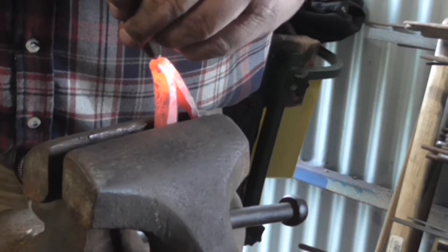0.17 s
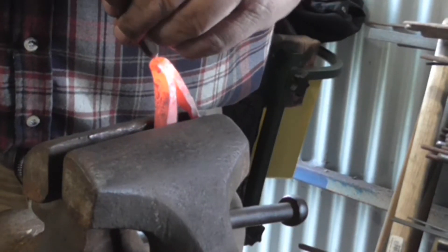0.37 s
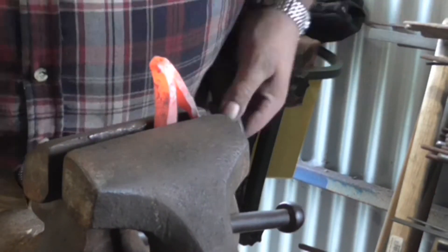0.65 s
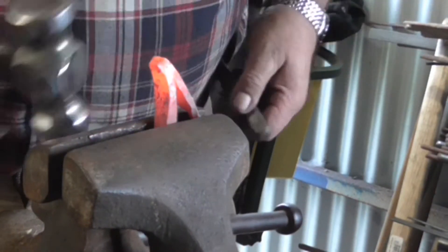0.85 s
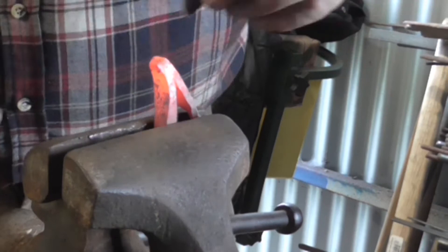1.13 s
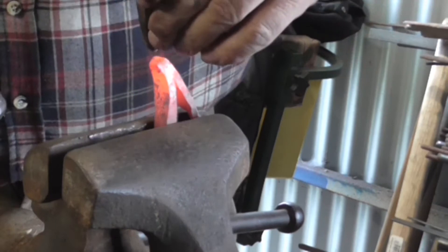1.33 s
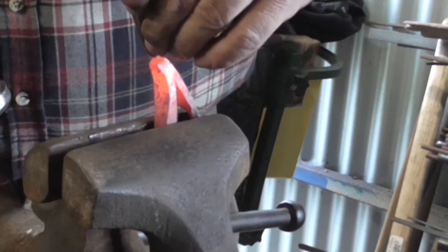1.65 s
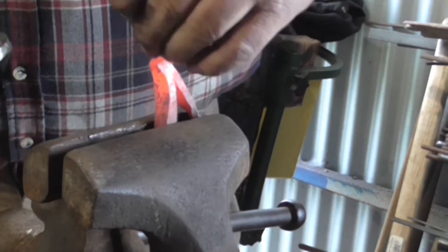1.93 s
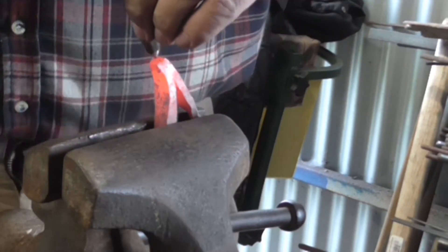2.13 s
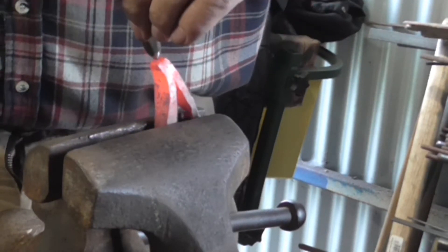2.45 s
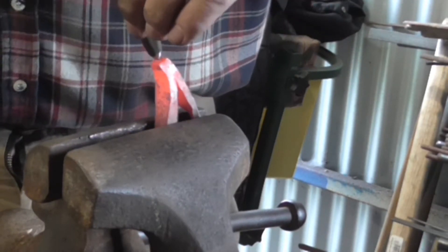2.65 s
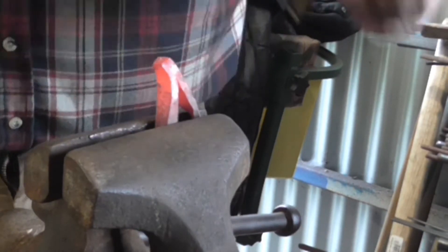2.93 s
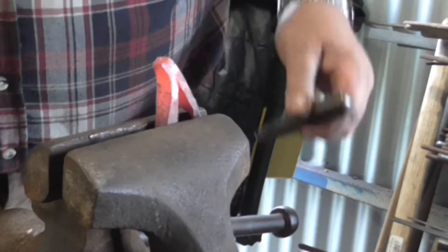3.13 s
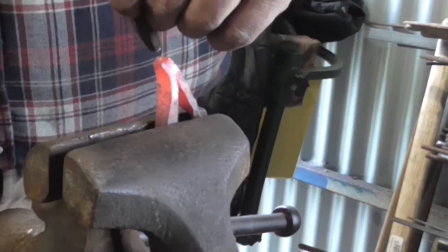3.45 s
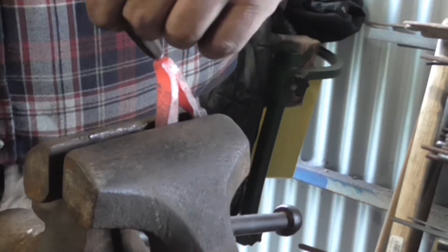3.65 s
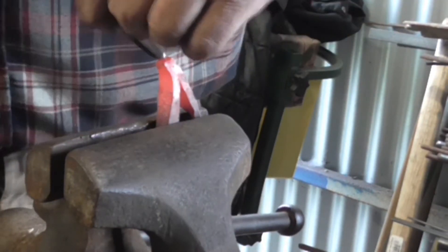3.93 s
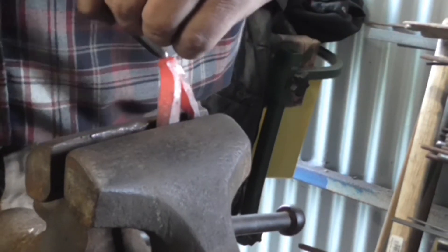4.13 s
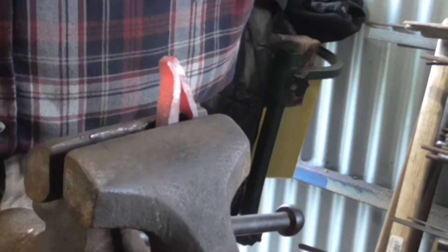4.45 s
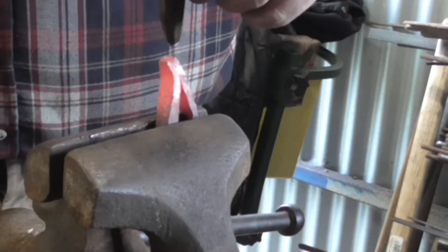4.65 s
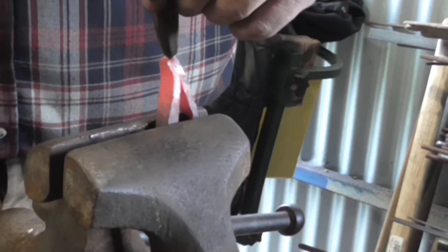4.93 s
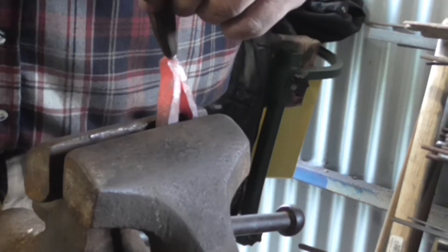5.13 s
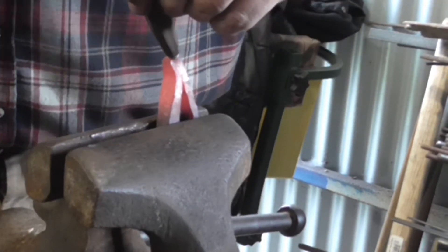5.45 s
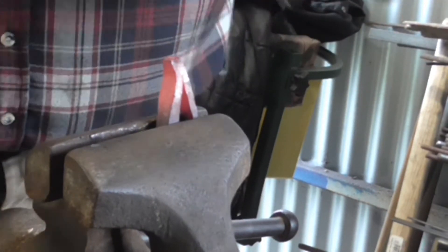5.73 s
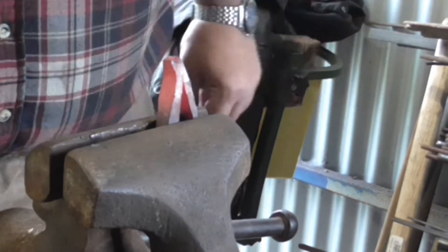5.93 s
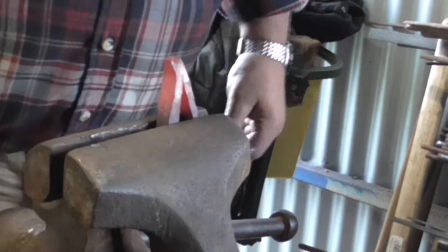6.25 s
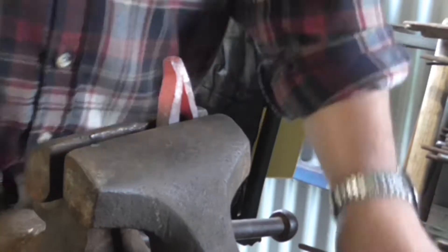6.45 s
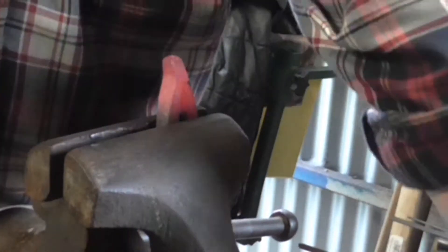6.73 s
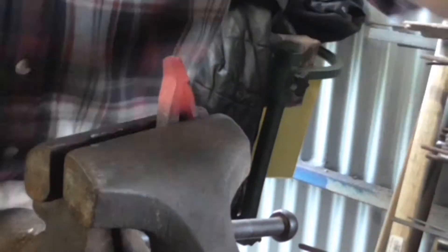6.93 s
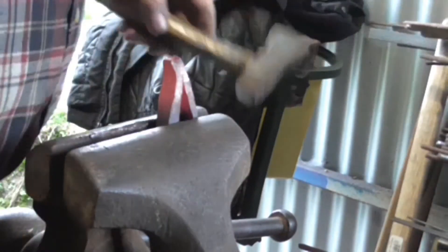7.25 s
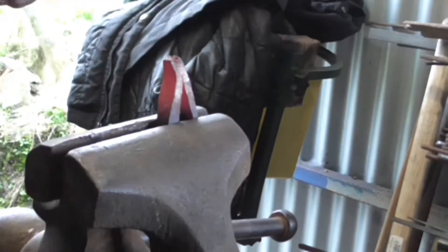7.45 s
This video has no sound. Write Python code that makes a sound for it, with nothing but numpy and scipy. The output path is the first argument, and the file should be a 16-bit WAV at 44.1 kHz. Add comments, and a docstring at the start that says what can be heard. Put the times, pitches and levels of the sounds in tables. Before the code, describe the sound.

Close stereo pickup in a metal shed workshop: constant midrange whoosh of a forge fan, throughout. Over it come one early steel knock, three groups of sharp, loud hammer strikes on a punch held to hot iron in a vice, and a bright ping as the punch bounces. After the last blow a tool clinks and scrapes on the vice and knocks again. Automatic level control sucks the roar down after every strong hit.

```python
"""A forge blower roars steadily in a tin-walled smithy: coloured noise under wavering sine whines.
Steel tools knock, clink and slide on a vice before, among and after the blows: noise and ringing modes.
A smith taps a punch into hot iron held in the vice: bright cracks, the ring of the vice, the shed's echo.
Every blow drives the limiter down, so the roar drops away and swells back."""
import sys
import numpy as np
from scipy import signal
from scipy.fft import rfft, irfft, next_fast_len
from scipy.io import wavfile
from scipy.ndimage import uniform_filter1d, minimum_filter1d

SR = 44100
rng = np.random.default_rng(int(sys.argv[2]) if len(sys.argv) > 2 else 0)


def wav_out(sig):
    """Save sig, one row per channel (or a flat mono array), as 16-bit PCM at SR to the path in sys.argv[1]."""
    wavfile.write(sys.argv[1], SR, np.round(np.clip(np.atleast_2d(sig).T, -1, 1) * 32767).astype(np.int16))


N = 334719
TIME = np.arange(N) / SR
HIT_TIME = TIME[:SR // 2]


def from_db(db):
    """Decibels to gain."""
    return 10 ** (np.asarray(db) / 20)


def rms_one(x):
    """Scale to rms 1."""
    return x / np.sqrt(np.mean(x ** 2) + 1e-20)


def at_hz(points, hz):
    """Read a spectrum along a logarithmic frequency axis."""
    f, db = np.transpose(points)
    return np.interp(np.log(hz), np.log(f), db)


def bins(size):
    """Frequencies of a spectrum of this many samples, kept at 1 Hz or more for the logarithms."""
    return np.maximum(np.fft.rfftfreq(size, 1 / SR), 1)


def drift(rate):
    """Slow random curve: straight lines between normal random knots, this many per second."""
    knots = rng.standard_normal(1024)
    return np.interp(TIME * rate, np.arange(len(knots)), knots)


def noise(level_db, width, size):
    """Stereo noise with the given relative level in each frequency bin; rms 1."""
    mid, side = rfft(rng.standard_normal((2, size))) * from_db(level_db)
    side = side * from_db(at_hz(width, bins(size)))
    return rms_one(irfft([mid + side, mid - side], size))


# rush of air and fire: (frequency [Hz], relative level [dB per Hz])
AIR_AND_FIRE_RUSH = [(20, -33), (60, -30), (130, -27.5), (210, -24.5), (265, -11.5), (365, -14.5),
                     (410, -4), (850, -1.5), (1400, -8.5), (2500, -9), (2750, -13), (6100, -19),
                     (7600, -27), (10000, -26.5), (11800, -24.5), (16000, -28.5)]
# resonances of the blower housing and the hearth: (frequency [Hz], width [Hz], boost over the rush [dB])
HOUSING_RESONANCES = [(495, 73, 8.5), (578.4, 79, 6.5), (678, 10, 14), (751.6, 91, 7.5), (868, 85, 2),
                      (1103, 112, 7), (1297, 24, 8.5), (1674, 28, 9), (1820, 22, 2.5), (1937, 12.4, 10.5),
                      (2070, 20, -1), (2165, 32, 5.5), (2325, 13, 3.5), (2850, 15, 9), (3270, 34, 6),
                      (3556, 56, 8), (4424, 116, 7), (5620, 25, 10.5)]
# hollows between the resonances: (frequency [Hz], width [Hz], change to the rush [dB])
RESONANCE_HOLLOWS = [(666, 49, -9.5), (1010, 130, -5.5), (1258, 27, -7), (2280, 56, -4.5)]
# stereo width of the roar: (frequency [Hz], side minus mid [dB])
ROAR_STEREO_WIDTH = [(60, -15), (120, -9), (240, -17), (480, -27.5), (950, -13.5), (1890, -10), (3770, -6),
                     (7520, -5.5), (15000, -5.5)]
# whine of motor and fan: (frequency [Hz], level around which it flickers [dB rms])
FAN_WHINE = [(967, -54.5), (1207, -58), (1296, -42), (1552, -41), (2176, -47), (2330, -39), (2493, -36),
             (2621, -43)]
ROAR_DB = -18.0  # rms of the rush while the smith screens it, before flutter
# the smith's body screens the forge until he steps aside
STEP_ASIDE_S, STEP_LENGTH_S, UNSCREENED_DB = 6.9, 0.31, 0.5


def blower(flutter_db=1.02, waver=0.001478, whine_flicker_db=2.5):
    """Turbulent air coloured by the housing, with the wavering whine of the fan on top."""
    size = next_fast_len(N)
    hz = bins(size)
    colour = at_hz(AIR_AND_FIRE_RUSH, hz)
    for f, width, db in HOUSING_RESONANCES + RESONANCE_HOLLOWS:
        colour = colour + db / (1 + ((hz - f) / (width / 2)) ** 2) ** 1.82
    aside = np.clip((TIME - STEP_ASIDE_S) / STEP_LENGTH_S, 0, 1)
    level_db = ROAR_DB + UNSCREENED_DB * aside + flutter_db * drift(24)
    rush = from_db(level_db) * noise(colour, ROAR_STEREO_WIDTH, size)[:, :N]

    speed = 1 + waver * drift(10)  # shared, so all the whines waver together
    turned = np.cumsum(speed) / SR
    whine = 0
    for f, db in FAN_WHINE:
        channel_phase = rng.normal(0, .2, (2, 1))
        phase = 2 * np.pi * f * turned + .5 * drift(20) + channel_phase
        level = np.sqrt(2) * from_db(db + whine_flicker_db * drift(18))  # rms to sine peak
        whine = whine + level * np.sin(phase)
    return rush + whine


def dying(t60):
    """Envelope that falls 60 dB in t60 seconds."""
    return from_db(-60 * HIT_TIME / t60)


def ring(modes, scatter_db, flutter_db=0):
    """Struck or rubbed modes, with new strengths at every touch and slightly different phases per channel."""
    out, knots = 0, HIT_TIME[::256]
    for hz, db, t60 in modes:
        grip, slip = [np.interp(HIT_TIME, knots, k) for k in rng.standard_normal((2, len(knots)))]
        # an unsteady contact shakes both level and phase
        start_phase = rng.uniform(0, 2 * np.pi) + rng.normal(0, 0.4, (2, 1))
        phase = start_phase + np.log(from_db(flutter_db)) * slip
        level = from_db(db + scatter_db * rng.normal() + flutter_db * grip)
        out = out + level * dying(t60) * np.sin(2 * np.pi * hz * HIT_TIME + phase)
    return out


def short_power(x):
    """Mean power of both channels over two milliseconds."""
    return np.maximum(uniform_filter1d(np.mean(x ** 2, axis=0), SR // 500), 1e-12)


def add(out, s, db, sound):
    """Place a sound at s seconds so that its loudest moment has the given level."""
    start = round(s * SR)
    part = sound[:, :N - start] / np.sqrt(short_power(sound).max())
    out[:, start:start + part.shape[1]] += from_db(db) * part


# colour of the shed's echo before tilt: (frequency [Hz], relative level [dB per Hz])
SHED_ECHO_COLOUR = [(150, 2), (400, -5.5), (800, 3), (1500, 2.5), (2500, 0.5), (6000, -4.5), (8000, -12),
                    (12000, -9.5), (16000, -5)]
# stereo width of the crack and its echo: (frequency [Hz], side minus mid [dB])
HIT_STEREO_WIDTH = [(300, -6), (1500, -12), (6000, -9), (14000, -12)]


def impact(colour_db, crack_t60, echo_db, echo_tilt_db, uneven_db=5.0, echo_t60=0.11):
    """A noise burst for the crack of dense steel modes, under a longer noise tail for the shed's echo."""
    size = len(HIT_TIME)
    hz = bins(size)
    # every hit gets its own uneven colour, half as strong in the echo
    uneven = uneven_db * np.interp(hz, np.linspace(0, SR / 2, 48), rng.standard_normal(48))
    crack = noise(colour_db + uneven, HIT_STEREO_WIDTH, size) * dying(crack_t60)
    echo_colour = at_hz(SHED_ECHO_COLOUR, hz) + echo_tilt_db + uneven / 2
    echo = noise(echo_colour, HIT_STEREO_WIDTH, size) * dying(echo_t60)
    return crack + from_db(echo_db) * echo


# tools knocking on the vice: (time [s], level [dB], pitch of the contact [Hz],
# narrowness [dB per octave], tool ring before the shared trim [dB])
TOOL_KNOCKS = [(.8495, 0, 4300, 30, -2), (5.8325, 8, 2300, 19, -24), (6.5495, 6, 3500, 8, 0),
               (4.0378, -8, 5500, 8, -12), (4.0807, -6, 3500, 12, -12), (6.5335, -10, 11000, 6, -12),
               (6.592, -15, 4000, 10, -12), (6.792, -7, 4900, 20, -14)]
# ring of a knocked tool: (frequency [Hz], relative level [dB], t60 [s])
TOOL_RING = [(2600, -22, .09), (3530, 4, 0.055), (4330, -1, .035), (4670, -15, .05)]
# a steel tool clinking on the vice, then sliding over it; the first touch is struck at once, the later
# ones swell: (time [s], rise [s], level [dB], brightness [dB per octave])
CLINK_AND_SLIDES = [(5.831, 0.0023, 2, 27), (5.848, 0.036, -12, -3.5), (6.053, 0.027, -17, -1)]
# modes of the clinking and sliding tool before brightness: (frequency [Hz], relative level [dB], t60 [s])
CLINK_AND_SLIDE_MODES = [(4370, -0.5, .14), (5050, -1, 0.1), (5750, -10, .11), (6620, -2, .13),
                         (11330, 2, 0.1), (12080, 4, .09), (15430, -11, .08)]


def tools(ring_trim_db=-6, skirt_db=26):
    """Tools knock in a band around each contact pitch; one clinks, then sings as it slides over the vice."""
    out, hz = np.zeros((2, N)), bins(len(HIT_TIME))
    for s, db, pitch_hz, narrowness, tool_db in TOOL_KNOCKS:
        octaves_away = np.abs(np.log2(hz / pitch_hz))
        colour = -np.minimum(narrowness * octaves_away, skirt_db)
        hit = impact(colour, crack_t60=0.011, echo_db=-11, echo_tilt_db=colour * 0.6, uneven_db=4.0)
        rung = ring(TOOL_RING, scatter_db=1.5)
        add(out, s, db, hit + from_db(ring_trim_db + tool_db) * rung)
    for s, rise, db, bright in CLINK_AND_SLIDES:
        onset = np.minimum(HIT_TIME / rise, 1) ** 1.46  # a clink rises at once, a slide swells
        modes = [(f, mode_db + bright * np.log2(f / 1000), t60) for f, mode_db, t60 in CLINK_AND_SLIDE_MODES]
        sung = ring(modes, scatter_db=1, flutter_db=1.5)
        add(out, s, db, onset * sung)
    return out


# hammer on punch: (time [s], level [dB])
HAMMER_BLOWS = [(2.149, -2.5), (2.3048, 12.5), (2.3945, 1.5), (2.5482, 14), (2.6503, 2), (2.798, 13.5),
                (3.824, 0.5), (3.9826, 11.5), (4.169, 14), (4.3334, 14.5), (5.1649, 10.5), (5.329, 12.5),
                (5.4843, 14.5), (5.6308, 14.5)]
# colour of a blow's crack before tilt: (frequency [Hz], relative level [dB per Hz])
CRACK_COLOUR = [(200, -30), (700, 0), (1500, 0.5), (2500, -10), (4500, -2.5), (5900, 6), (7500, -3),
                (10000, -4), (13500, 2), (16000, 2.5)]
# ring of the vice: (frequency [Hz], relative level [dB], t60 [s])
VICE_RING = [(1247, -6, 0.15), (1562, -2, 0.14), (1740, -11, 0.17), (2530, -12, 0.14), (3000, -19, 0.12),
             (3430, 0.5, 0.063), (5720, -0.5, 0.035), (6210, 5.5, 0.031)]
# the punch bouncing freely: (time [s], level [dB])
PUNCH_PINGS = [(4.231, 5)]
# ring of the free punch: (frequency [Hz], relative level [dB], t60 [s])
PUNCH_RING = [(4020, -12, .08), (6304, -18, 0.35), (7063, -22, .3), (7940, -19, 0.36), (10900, -14, .08),
              (12200, -6, .09), (12670, -3, .1), (13860, -12, .18), (14360, 1, .09), (14800, -7, .11),
              (15400, 6, .08)]
# a firm blow: its level, its tilt (dB per octave), and the vice's ring and shed's echo beside its crack
FIRM_DB, FIRM_TILT_DB, VICE_RING_DB, SHED_ECHO_DB = 13, 0.6, -15, -7
# growth of tilt, ring and echo for each dB of a harder blow
TILT_PER_DB, RING_PER_DB, ECHO_PER_DB = 0.11, 0.1, 0.37
# the iron stiffens as it cools and passes more of each blow into the vice:
# growth of the ring (dB per s), counted from mid-way (s)
COOLING_DB_PER_S, HALF_COOLED_S = 1.8, 4.6


def hammering():
    """Harder blows are brighter and wake more of the vice and the shed; once the punch rings free."""
    out, hz = np.zeros((2, N)), bins(len(HIT_TIME))
    for s, db in HAMMER_BLOWS:
        force = db - FIRM_DB
        tilt = (FIRM_TILT_DB + TILT_PER_DB * force) * np.log2(hz / 1000)
        vice_db = VICE_RING_DB + RING_PER_DB * force + COOLING_DB_PER_S * (s - HALF_COOLED_S)
        echo_db = SHED_ECHO_DB + ECHO_PER_DB * force
        hit = impact(at_hz(CRACK_COLOUR, hz) + tilt, crack_t60=0.025, echo_db=echo_db, echo_tilt_db=tilt)
        add(out, s, db, hit + from_db(vice_db) * ring(VICE_RING, scatter_db=2.0))
    for s, db in PUNCH_PINGS:
        echo_tilt = 5.1 * np.log2(hz / 6000)
        hit = impact(at_hz(CRACK_COLOUR, hz), crack_t60=0.011, echo_db=0, echo_tilt_db=echo_tilt)
        add(out, s, db, hit + from_db(-4) * ring(PUNCH_RING, scatter_db=3, flutter_db=2.0))
    return out


def scene(steel_low_cut_hz=350, right_db=0.44):
    """Small steel parts radiate little bass; everything leans a little to the right."""
    low_cut = signal.butter(3, steel_low_cut_hz, "high", fs=SR, output="sos")
    roar = blower()
    steel = signal.sosfilt(low_cut, tools() + hammering())
    return (roar + steel) * from_db([[-right_db], [right_db]])


def record(dry, threshold_db=-10.5, release_db_per_s=50.5, hold_s=0.0075, cutoff_hz=15900):
    """A limiter clamps just ahead of each peak, holds and recovers; peaks are rounded and the top is cut."""
    over = np.maximum(10 * np.log10(short_power(dry)) - threshold_db, 0)
    over = -minimum_filter1d(-over, SR // 600)  # a running maximum, centred so that it looks ahead
    recovery = release_db_per_s * TIME
    released = np.maximum.accumulate(over + recovery) - recovery
    held = np.maximum(released, np.interp(TIME - hold_s, TIME, released))
    limited = dry * from_db(-uniform_filter1d(held, SR // 1000))
    rounded = limited / (1 + (limited / .85) ** 10) ** (1 / 10)
    top_cut = signal.ellip(10, .1, 80, cutoff_hz, fs=SR, output="sos")
    return signal.sosfilt(top_cut, rounded)


dry = scene()
out = record(dry)
wav_out(out)
```